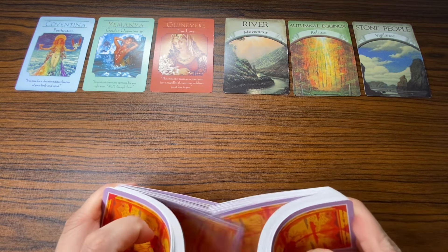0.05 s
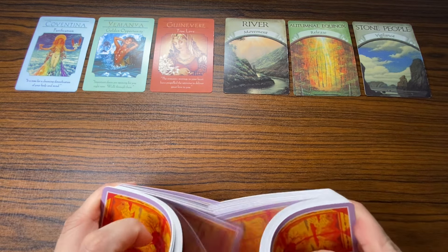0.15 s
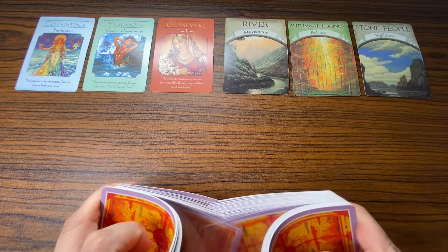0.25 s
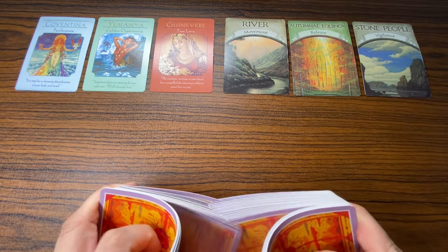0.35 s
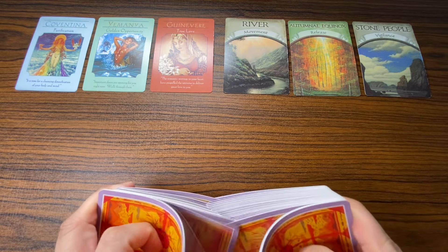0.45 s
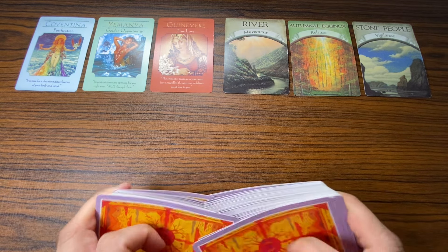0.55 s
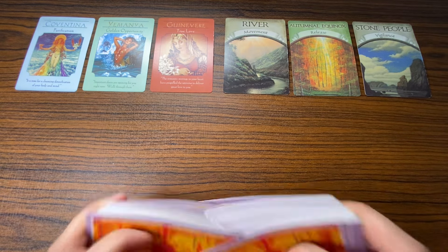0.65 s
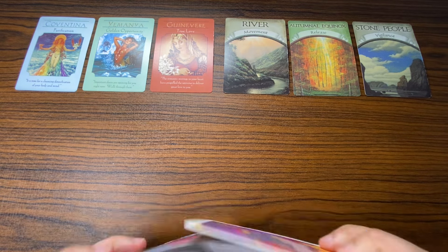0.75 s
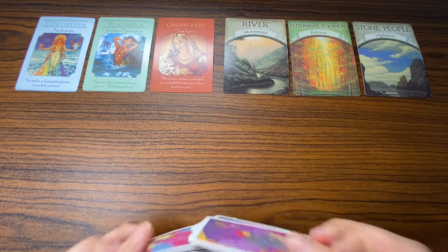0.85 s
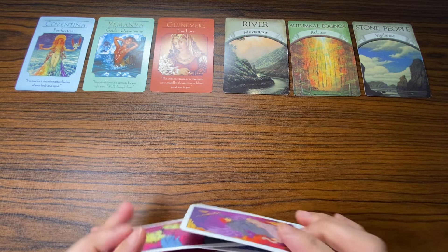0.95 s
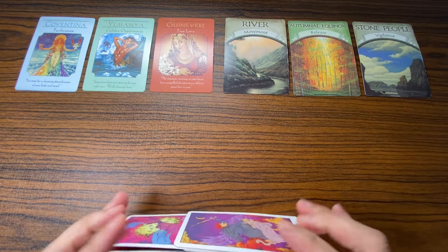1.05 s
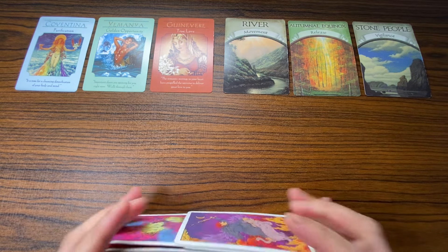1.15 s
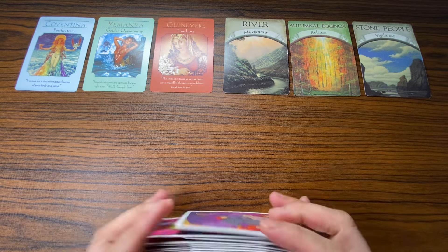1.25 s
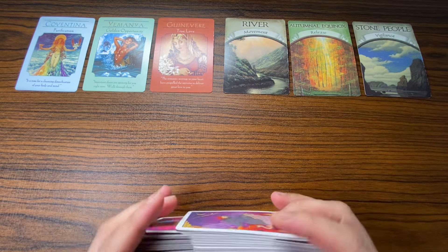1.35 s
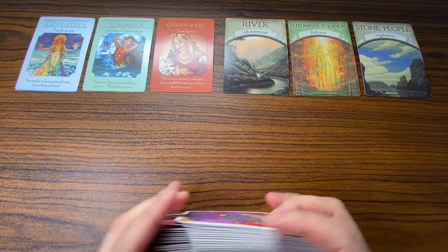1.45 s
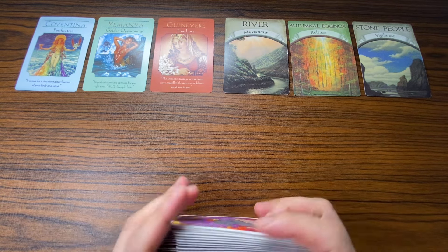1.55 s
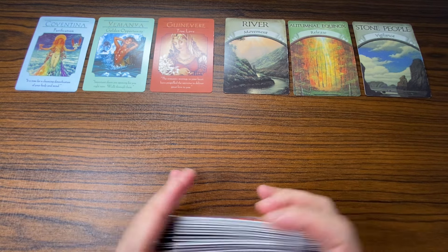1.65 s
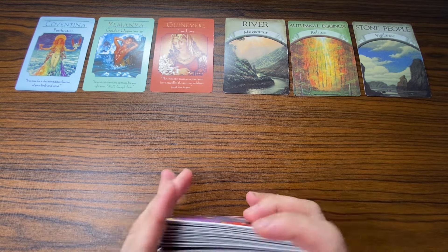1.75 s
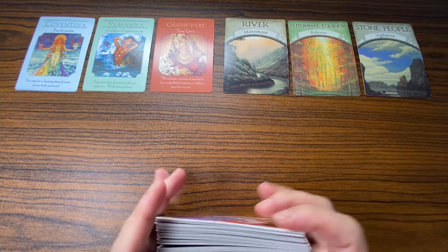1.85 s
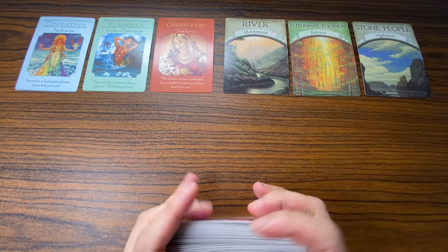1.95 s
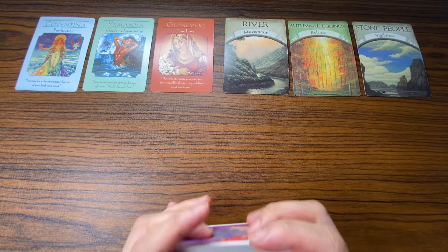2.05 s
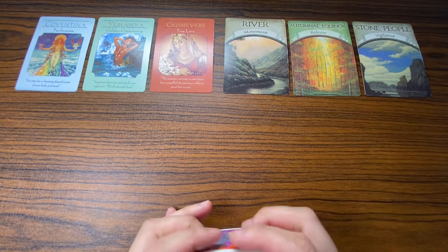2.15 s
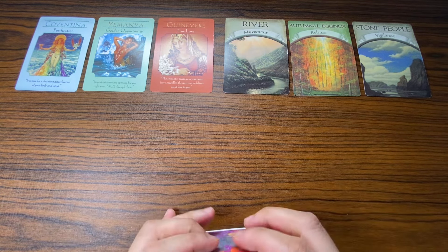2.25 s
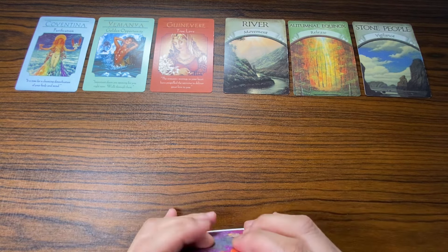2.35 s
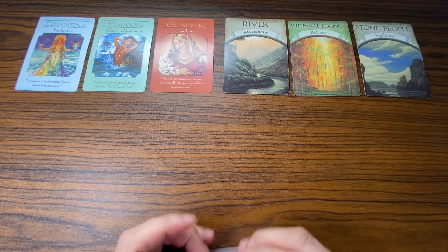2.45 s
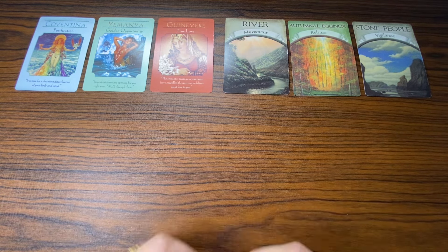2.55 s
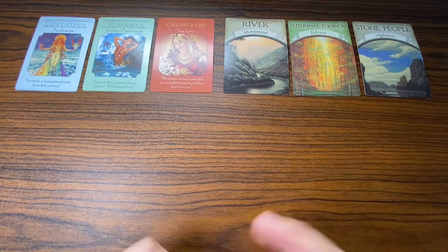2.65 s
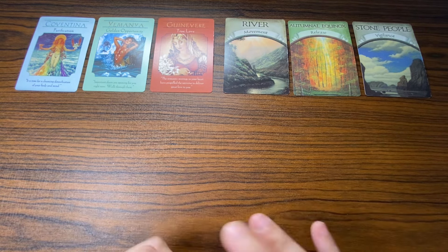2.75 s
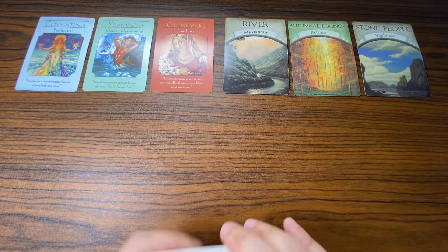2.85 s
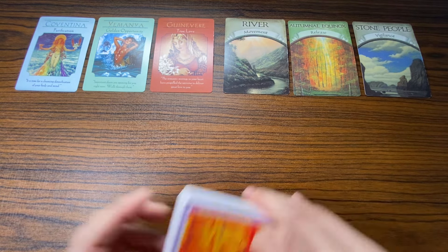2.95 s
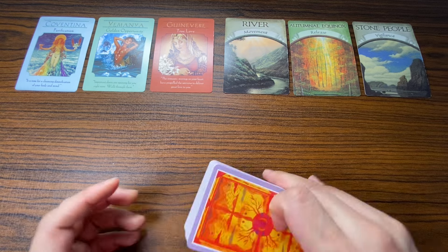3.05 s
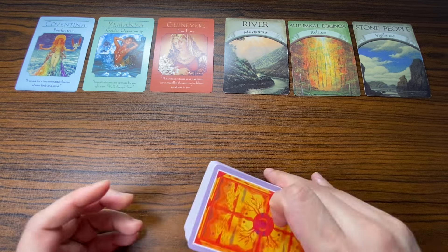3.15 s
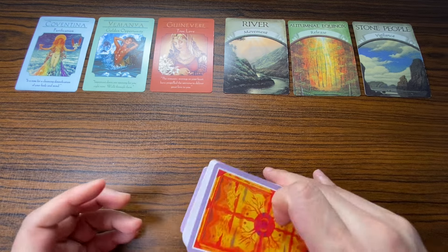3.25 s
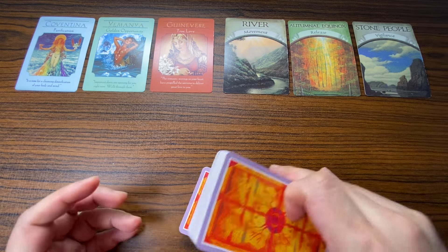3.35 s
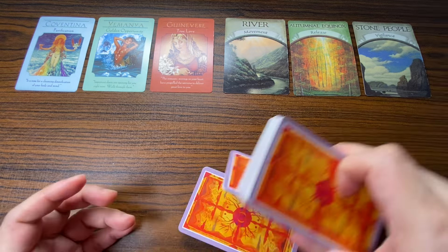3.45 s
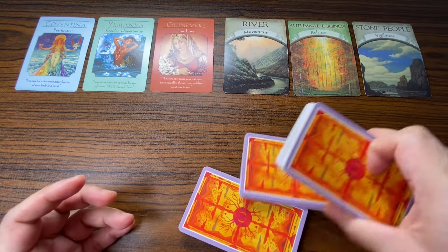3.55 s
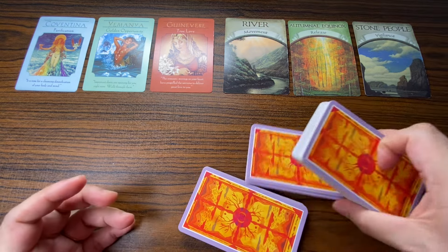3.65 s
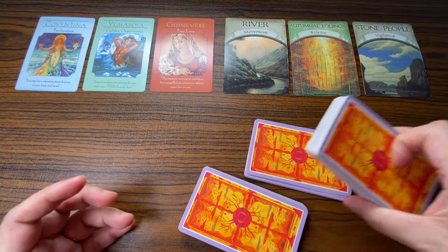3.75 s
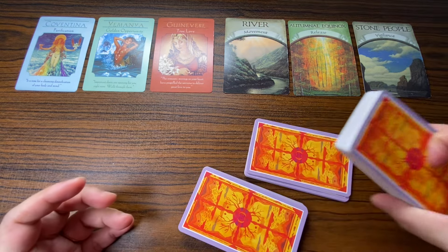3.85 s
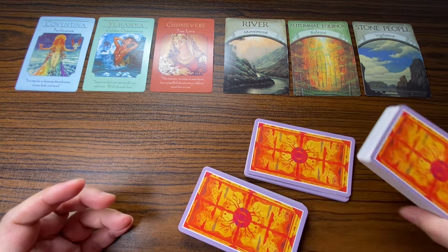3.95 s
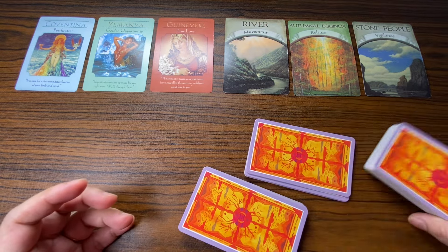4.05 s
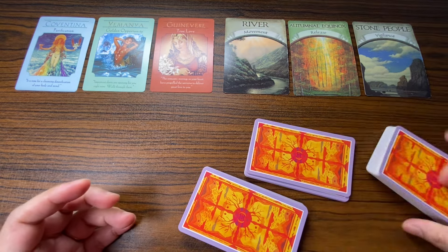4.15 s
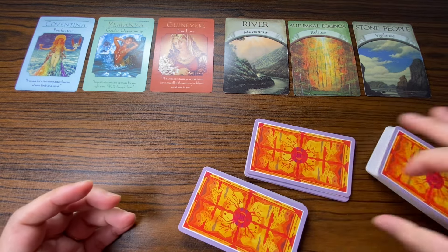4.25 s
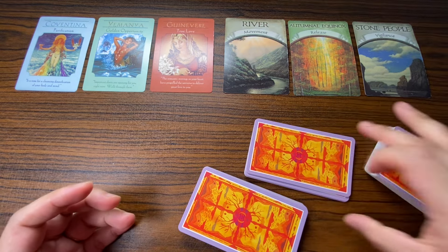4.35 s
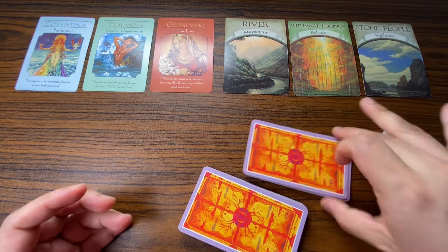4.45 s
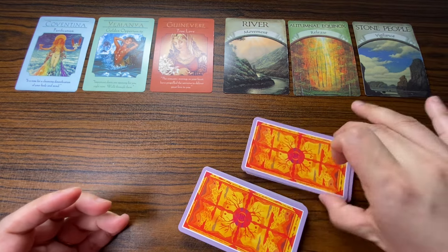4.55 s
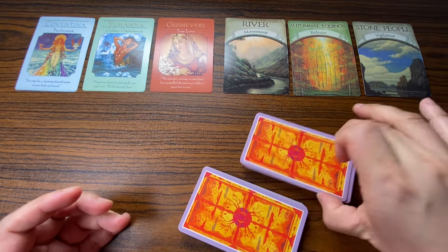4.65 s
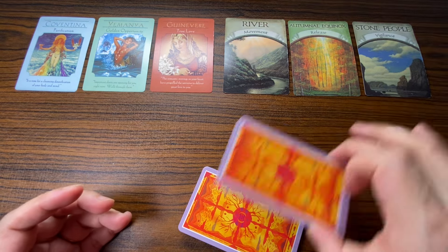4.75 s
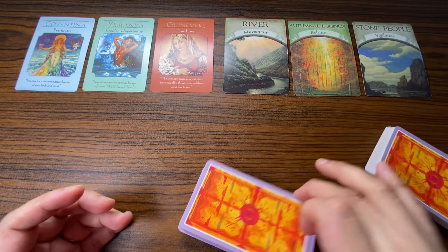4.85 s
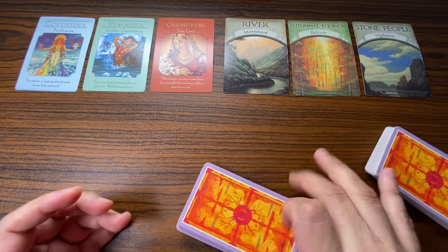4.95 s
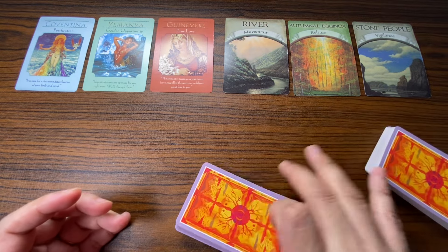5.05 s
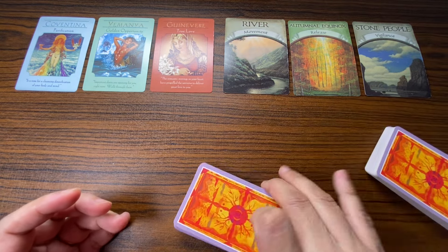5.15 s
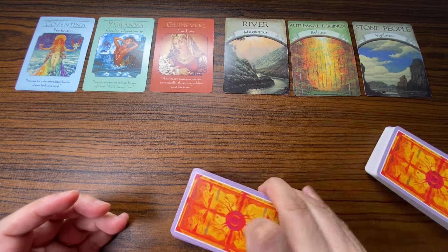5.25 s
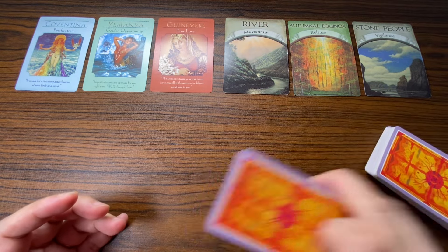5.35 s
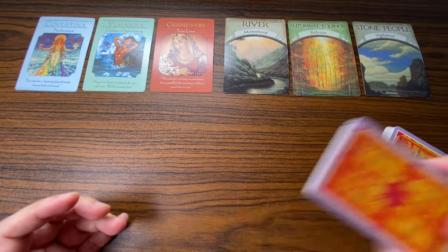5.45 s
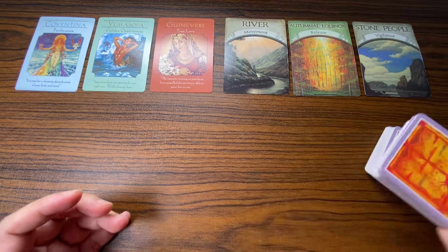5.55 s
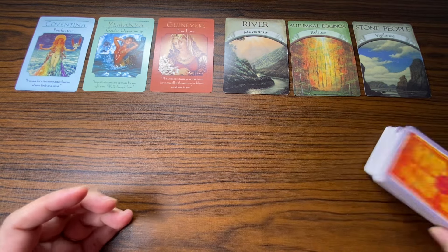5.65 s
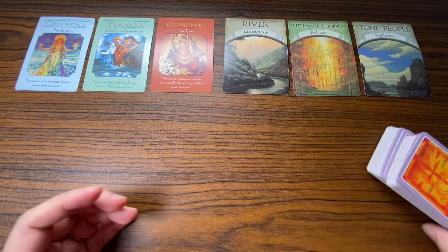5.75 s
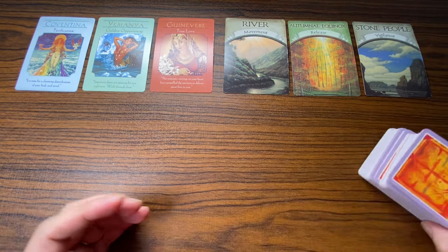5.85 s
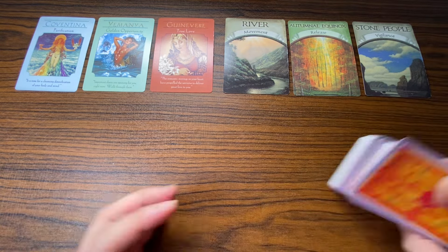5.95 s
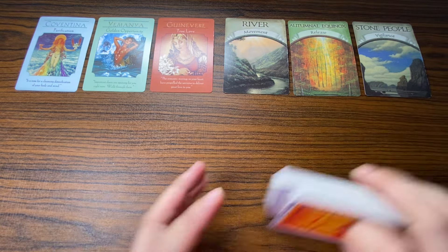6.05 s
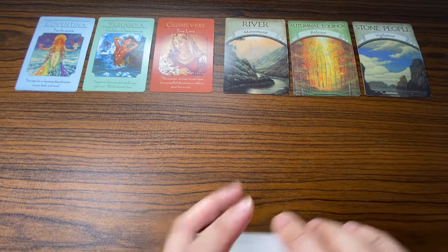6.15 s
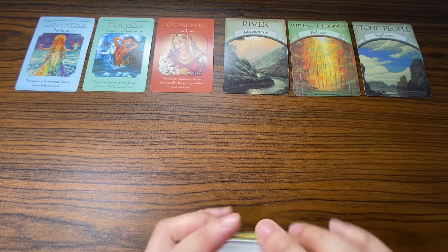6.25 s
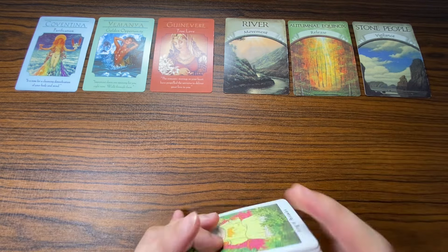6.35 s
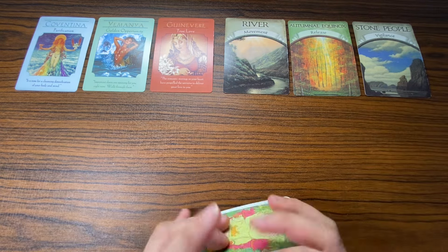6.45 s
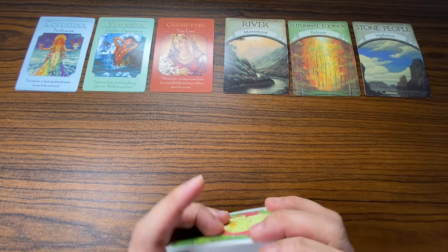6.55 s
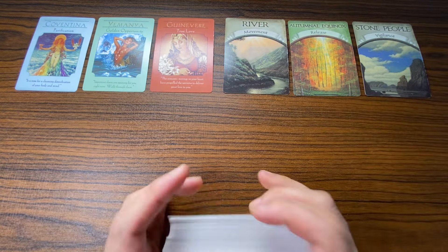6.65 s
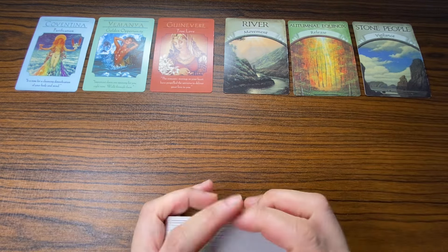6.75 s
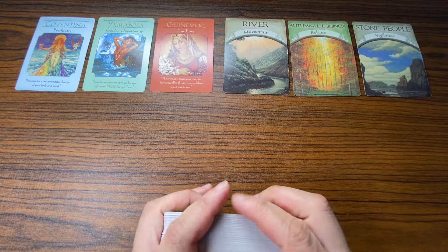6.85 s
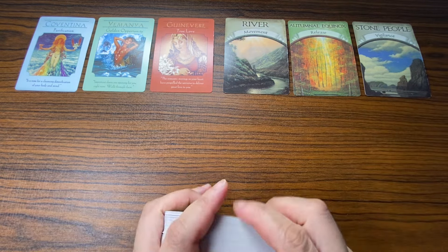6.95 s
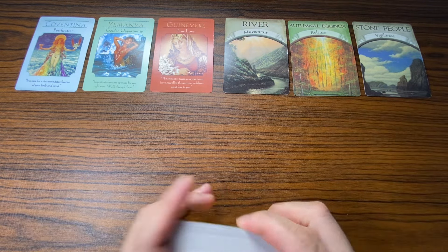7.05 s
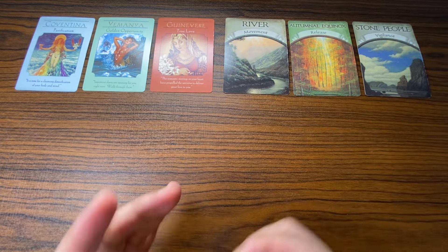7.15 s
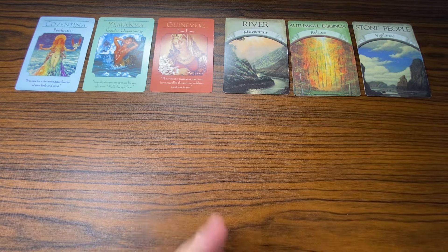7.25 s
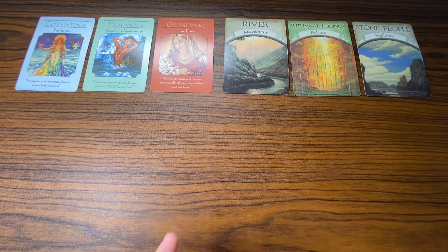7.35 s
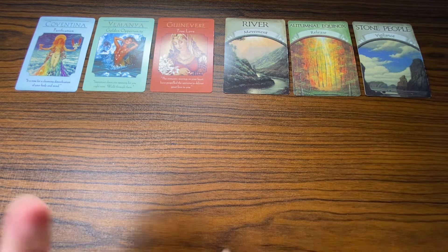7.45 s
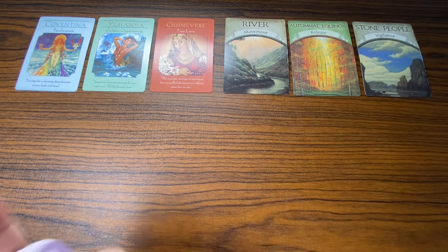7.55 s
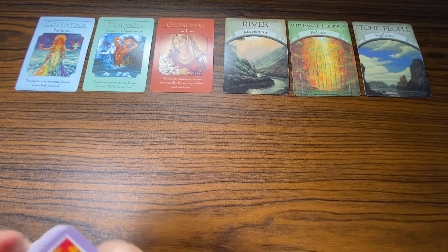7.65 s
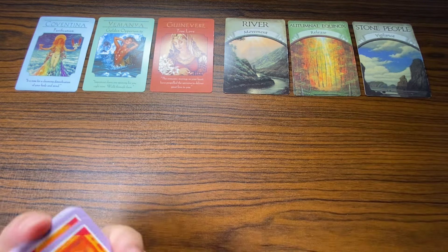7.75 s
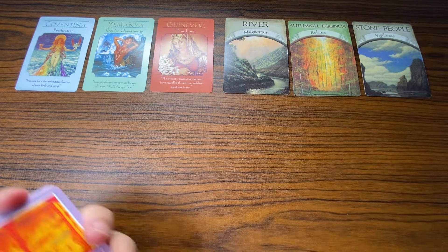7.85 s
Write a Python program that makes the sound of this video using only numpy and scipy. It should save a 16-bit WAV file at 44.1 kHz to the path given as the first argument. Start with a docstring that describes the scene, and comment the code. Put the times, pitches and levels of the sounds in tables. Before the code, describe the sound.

A deck of large cards riffles in a fast fluttering burst, is knocked square, cut into piles and restacked on a wooden table.

```python
"""Riffling and stacking a deck of cards

A deck of large cards is riffled on a wooden table, pushed together, squared, cut into piles and stacked again.
Card snaps, ticks, clacks and slaps are short bursts of coloured noise; rasping edges, sliding cards and
brushing fingers are noise driven by many tiny slips. Decaying sine waves ring the table top.
A small room answers, a low hum wavers behind it all, and the stereo microphone is close."""
import sys
import numpy as np
from scipy import signal
from scipy.fft import rfft, irfft, next_fast_len
from scipy.io import wavfile
from scipy.ndimage import map_coordinates

SR = 44100
rng = np.random.default_rng(int(sys.argv[2]) if len(sys.argv) > 2 else 0)


def store_wav(level_fs):
    """Save 16-bit WAV to argv[1]."""
    pcm = np.round(np.clip(np.atleast_2d(level_fs), -1, 1) * 32767)
    wavfile.write(sys.argv[1], SR, pcm.T.astype(np.int16))


N = 347949
RING = np.arange(SR // 10) / SR  # time inside one card contact (s)

# Colour of card edges knocking. Each row: frequency in Hz, relative level in dB.
CLACK_COLOUR = [(150, -24), (500, -4.5), (1100, -6.5), (1750, -3.5), (2300, 0.5), (3400, 7), (5000, 4.5),
                (6700, 4.5), (7700, -6.5), (10500, -6), (13000, -22), (16500, -37)]
# Colour of a card edge or corner flicking free. Each row: frequency in Hz, relative level in dB.
TICK_COLOUR = [(300, -33), (1000, 6), (4000, 2.5), (8000, 5), (12500, 5), (16500, -13.5)]
# The deck is pushed together and squared. Each row: rasp start in seconds, moment the cards hit home in
# seconds, rattle length in seconds, relative rasp level in dB, relative table thud in dB, hardness in dB.
SQUARINGS = [(0.828, 0.832, 0.021, -25, -18, -1), (0.985, 1.031, 0.077, -27.5, -26.5, -1.5),
             (1.664, 1.703, 0.0065, -22.5, -25, -5), (1.774, 1.798, 0.044, -26, -31, 8.5),
             (2.125, 2.1598, 0.017, -21.5, -17.5, -9), (6.263, 6.269, .009, -23.5, -12, -4.5),
             (6.607, 6.634, 0.017, -24.5, -31.5, 6), (6.987, 7.0356, 0.017, -53, -22, -7)]
# Piles set down flat. Each row: time in seconds, card slap in dB, packet tock in dB, relative table thud
# in dB, table body in dB against the thud, table knock in dB against the thud.
LANDINGS = [(2.7521, -31.5, -30, -50, -11, -1), (3.2283, -12, -14, -10, 0.5, 5),
            (3.53, -45, -48, -20, -5, -11), (4.089, -31.5, -45, -17.5, -2, -27),
            (4.1273, -21, -13.5, -12.5, 3, -3.5), (4.903, -36, -50, -24.5, -1, -12.5),
            (5.6367, -41, -22, -7.5, -10, -13.5)]


def amp(db):
    """Turn decibels into a gain."""
    return 10 ** (np.asarray(db) / 20)


def unit(x):
    """Scale a sound to an rms level of 1."""
    return x / np.sqrt(np.mean(x ** 2) + 1e-20)


def along(points, hz):
    """Read a curve of (Hz, value) points, with frequency on a log axis."""
    f, v = np.transpose(points)
    return np.interp(np.log(hz + 1), np.log(f + 1), v)


def gains(rows, fade=0.0096):
    """Turn rows of (seconds, dB, ..) into a gain curve per dB column, fading in and out over fade seconds."""
    s, *columns = np.transpose(rows)
    t = np.arange(N) / SR
    gate = np.clip(1 + np.minimum(t - s[0], s[-1] - t) / fade, 0, 1)
    return [gate * amp(np.interp(t, s, column)) for column in columns]


def wobble(rate):
    """Draw a smooth random curve through rate random points a second."""
    points = rng.standard_normal(int(N * rate / SR) + 4)
    return map_coordinates(points, [np.arange(N) * rate / SR])


def chance(start, end, rate):
    """Pick loosely spaced times in seconds, rate of them a second."""
    slots = np.arange(start, end - 1 / rate, 1 / rate)
    return slots + rng.random(len(slots)) / rate


def add(track, s, sound):
    """Mix a sound into the track at s seconds."""
    start = max(round(s * SR), 0)
    track[..., start:start + sound.shape[-1]] += sound[..., :N - start]


def coloured(x, curve):
    """Filter a sound so its gain in dB is curve(Hz), with no echo ahead of the sound (minimum phase)."""
    n = x.shape[-1]
    m = 2 * next_fast_len(n // 2 + 2048)
    gain = amp(curve(np.fft.rfftfreq(m, 1 / SR)))
    cepstrum = irfft(np.log(np.maximum(gain, 1e-6)))
    # folding the second half onto the first makes the filter act only after its input
    cepstrum[1:m // 2] *= 2
    cepstrum[m // 2 + 1:] = 0
    return irfft(rfft(x, m) * np.exp(rfft(cepstrum)), m)[..., :n]


def noise(spectrum, drive=1):
    """Make stereo noise of rms 1 under a drive: more alike left and right in the bass than in the treble."""
    # Each row: frequency in Hz, left-right likeness from 0 (unrelated) to 1 (the same).
    likeness = [(60, 0.82), (130, 1), (260, 0.64), (600, 0), (3000, 0), (12000, 0.09)]
    a, b = rng.standard_normal((2, N)) * drive
    alike = lambda hz: np.clip(along(likeness, hz), -.99, .99)
    mid = coloured(a, lambda hz: along(spectrum, hz) + 10 * np.log10(1 + alike(hz)))
    side = coloured(b, lambda hz: along(spectrum, hz) + 10 * np.log10(1 - alike(hz)))
    return unit(np.array([mid + side, mid - side]))


def grains(rate, spread_db, life):
    """Make a drive of rms 1 from tiny slips at random times, each falling 60 dB within life seconds."""
    strength = amp(spread_db * np.clip(rng.standard_normal(N), -2, 2))
    slips = (rng.random(N) < rate / SR) * strength
    return unit(signal.lfilter([1], [1, -amp(-60 / (life * SR))], slips))


def contact(spectrum, tone, t60, hold=0, shared=0.44, grip_db=3.5):
    """One blow: a short crackle, held while its cards arrive, with its colour shaped by the blow's tone."""
    common, *own = rng.standard_normal((3, len(RING)))
    decay = amp(-60 * np.maximum(RING - hold, 0) / t60)
    burst = (shared * common + np.array(own)) * decay * (1 - np.exp(-RING / 0.00064))
    # each card is bent and gripped differently, which shifts its resonances
    grip = np.column_stack([np.geomspace(700, 14000, 22), grip_db * rng.uniform(-1, 1, 22)])
    return coloured(burst, lambda hz: along(spectrum, hz) + along(tone, hz) + along(grip, hz))


def background(floor_db=-43, hum_db=0, drift=1.0):
    """Ventilation: a dull rush of noise, and low sine tones that waver in pitch and level."""
    # The rush. Each row: frequency in Hz, relative level in dB.
    rush_colour = [(20, -32), (40, -12.5), (65, -7), (110, -5), (135, -9), (172, -4.5), (215, -5),
                   (290, -12.5), (400, -18.5), (1100, -24), (1650, -30), (2200, -33.5), (3500, -39.5),
                   (4400, -36.5), (7500, -54.5), (13000, -55), (15000, -75)]
    # The hum. Each row: frequency in Hz, level in dB.
    hum_tones = [(167, -40.5), (280, -53.5)]
    t = np.arange(N) / SR
    hum = np.zeros((2, N))
    for hz, db in hum_tones:
        phase = 2 * np.pi * hz * t + drift * wobble(26)
        waver = amp(3 * wobble(7))
        hum += amp(db + hum_db) * waver * np.sin(phase + [[.3], [-.3]])
    return hum + amp(floor_db) * noise(rush_colour)


def room(x, gap=0.0016):
    """The walls answer after a short gap with a tail of noise, each pitch dying at its own speed."""
    # Each row: frequency in Hz, time to fall 60 dB in seconds.
    decay_times = [(100, 0.8), (300, 0.24), (900, 0.21), (2500, 0.34), (6000, 0.27), (13000, 0.2),
                   (16000, 0.11)]
    # Each row: frequency in Hz, reflected level in dB.
    reflected = [(60, -13), (200, -2.5), (600, -1.5), (3000, -4), (6500, -5.5), (9000, -3.5), (15000, -16)]
    out, size = np.zeros((2, N)), SR // 2
    # every half second of sound gets a fresh random tail
    for start in range(0, N, size):
        hz, t, z = signal.stft(rng.standard_normal((2, size)), SR, nperseg=256)
        decay = amp(-60 * t / along(decay_times, hz)[:, None])
        tail = signal.istft(z * decay, SR)[1]
        tail *= np.clip(np.arange(tail.shape[1]) / SR / gap - 1, 0, 1)
        tail = tail / np.linalg.norm(tail[0])
        add(out, start / SR, signal.fftconvolve(x[:, start:start + size], tail, axes=1))
    return coloured(out, lambda hz: along(reflected, hz))


def blows(body_db=-0.5, body_share=0.83):
    """List all that strikes the table as (s, thud dB, body dB, knock dB); harder squaring adds body and knock."""
    # The hands bump the table softly. Each row: time in seconds, relative thud in dB.
    bumps = [(0.485, -25), (3.6, -21), (4.407, -32.5), (5.099, -28), (6.814, -26)]
    bump_body_db, bump_knock_db = -9.5, -21.5  # against the thud
    flats = [(s, db, body, knock) for s, *_, db, body, knock in LANDINGS]
    edges = [(home, db, body_db + body_share * hard, hard) for _, home, *_, db, hard in SQUARINGS]
    return flats + edges + [(s, db, bump_body_db, bump_knock_db) for s, db in bumps]


def table(blow_db=-7, attack=0.0011, apart_hz=420, dense_db=3, dense_t60=0.053):
    """Each blow rings the wooden top's modes: soft ones press in slowly, harder ones reach higher modes."""
    # Modes of the top. Each row: nominal frequency in Hz, relative level in dB, time to fall 60 dB in seconds.
    modes = [(70.9, 2.5, 0.3), (92.6, -0.5, 0.089), (116.3, 0.5, 0.21), (169.1, -1.5, 0.31),
             (220.7, 3, 0.049), (270.5, -2, 0.14), (323.3, -4, 0.07), (383, -2.5, 0.064),
             (443.6, 1.5, 0.075), (496, -4.5, 0.094), (730, -2.5, 0.072), (1125, -4.5, 0.089)]
    # Colour of the short knock. Each row: frequency in Hz, relative level in dB.
    knock_colour = [(120, -18.5), (300, -11), (600, -2), (820, 9), (1200, -4), (1800, -10), (3000, -18),
                    (8000, -37.5)]
    out, t = np.zeros((2, N)), np.arange(SR // 2) / SR
    hz, level, t60 = np.transpose(modes)
    decay = amp(-60 * t / t60[:, None])
    for s, db, body_db, knock_db in blows():
        strength, detune, turn = rng.uniform(-1.25, 1, (3, len(hz)))
        tone = along([(80, 0.0015), (210, body_db), (500, body_db), (750, knock_db)], hz)
        size = amp(db + blow_db + level + tone + 2 * strength)
        # higher modes differ more between left and right
        apart = turn * np.minimum(hz / apart_hz, 1) * np.pi / 2
        phase = np.multiply.outer([1, -1], apart) + np.pi * np.arange(len(hz))
        swing = np.sin(2 * np.pi * np.outer(hz * (1 + .012 * detune), t) + phase[..., None])
        press = 1 - np.exp(-t * amp(body_db) / attack)
        add(out, s, size @ (swing * decay) * press)
        # the crowded upper modes merge into a short knock
        add(out, s, amp(db + knock_db + dense_db) * contact(knock_colour, [(1, 0)], dense_t60))
    # a panel radiates little below its lowest mode
    return coloured(out, lambda f: along([(20, -16.0), (40, -16.5), (62, 2.5)], f))


def deck(x, width_hz=85, trim_db=-2.0):
    """The stack of cards lifts a few narrow bands of every sound made on it."""
    # Resonances of the held deck. Each row: frequency in Hz, lift in dB before the overall trim.
    resonances = [(1090, 2), (1700, 7), (2260, 6.5), (2950, 2.5), (3470, 4.5), (4700, 1.5), (6250, 2)]
    bump = lambda f, hz: np.exp(-((f - hz) / width_hz) ** 2)
    return coloured(x, lambda f: trim_db + sum(db * bump(f, hz) for hz, db in resonances))


def rubbing(spectrum, drive, count=3):
    """Friction of rms 1: patches of card catch and let go in turn, each with its own resonances."""
    out = np.zeros((2, N))
    for _ in range(count):
        grip = np.column_stack([np.geomspace(400, 9000, 30), rng.uniform(-7, 7, 30)])
        patch = coloured(noise(spectrum, drive), lambda hz: along(grip, hz))
        out += amp(4 * wobble(55)) * patch
    return unit(out)


def handling(slide_db=-1, skin_db=-1):
    """Strokes swell and fade as cards slide on cards and wood and skin brushes them; a held deck rustles."""
    # Each row: start in seconds, end in seconds, relative sliding level in dB, relative skin brushing in dB.
    strokes = [(0.64, 0.724, -46.5, -45.5), (1.135, 1.294, -37.5, -49), (1.394, 1.52, -38, -42.5),
               (1.86, 2.062, -45.5, -55.5), (2.094, 2.158, -33.5, -53), (2.377, 2.455, -48, -56),
               (3.212, 3.239, -25, -70), (3.391, 3.557, -39, -54), (3.533, 3.726, -46, -78),
               (4.055, 4.15, -38.5, -46.5), (4.38, 4.492, -38.5, -57), (5.066, 5.132, -48, -57.5),
               (5.613, 5.656, -41.5, -53.5), (5.951, 6.13, -37.5, -50.5), (6.07, 6.226, -35.5, -56),
               (6.247, 6.317, -29, -62), (6.382, 6.59, -45, -61), (6.562, 6.675, -35, -64),
               (6.77, 6.96, -46.5, -54.5), (6.912, 7.122, -41, -56), (7.27, 7.407, -78, -56),
               (7.696, 8.03, -64, -52)]
    # The fingers hold and shift the deck. Each row: start in seconds, end in seconds.
    holds = [(0.55, 3.18), (3.4, 3.73), (5.65, 7.58)]
    # Colours of sliding cards and brushing skin. Each row: frequency in Hz, relative level in dB.
    slide_colour = [(150, -22), (300, 5), (470, 9), (620, 2.5), (1000, 1.5), (2000, -8.5), (6500, -15),
                    (9000, -45.5), (16000, -65)]
    skin_colour = [(2000, -7.5), (5000, -6), (8000, -5.5), (10000, -1.5), (13300, -10), (14500, -14.5),
                   (16500, -29.5)]
    hold_slide_db, hold_skin_db, fidget_db = -61, -66.5, 5  # rustle levels, and how much they waver
    slide, skin = np.zeros((2, N))
    for start, end, sliding_db, brushing_db in strokes:
        speed = signal.windows.tukey(max(round((end - start) * SR), 2), .7)
        add(slide, start, amp(sliding_db + slide_db) * speed)
        add(skin, start, amp(brushing_db + skin_db) * speed)
    held = sum(gains([(start, 0), (end, 0)], fade=0.024)[0] for start, end in holds)
    held = held * amp(fidget_db * wobble(27))
    slide = np.hypot(slide, amp(hold_slide_db) * held)
    skin = np.hypot(skin, amp(hold_skin_db) * held)
    catches = grains(rate=700, spread_db=3.5, life=.02)
    ridges = grains(rate=3000, spread_db=2, life=.02)
    return slide * rubbing(slide_colour, catches) + skin * noise(skin_colour, ridges)


def shoves(rasp_db=-3, chatter_db=10, fade=0.011):
    """Card edges catch and slip past each other: a rasp swells until they hit home; hard pushes add crisp ticks."""
    # Colour of the rasp. Each row: frequency in Hz, relative level in dB.
    rasp_colour = [(120, -34.5), (220, 3), (600, -1), (850, 4.5), (1300, -3), (1700, 2), (3000, 1.5),
                   (4500, -9.5), (6700, -30), (7800, -31), (12000, -28.5), (16000, -43.5)]
    swell_db_per_s = 193  # the rasp grows as the cards near home
    push = np.zeros(N)
    for touch, home, rattle, db, *_ in SQUARINGS:
        start = min(touch, home)
        start_db = db - swell_db_per_s * (home - start)
        push += gains([(start, start_db), (home, db), (home + rattle, db)], fade)[0]
    slips = grains(rate=800, spread_db=3.5, life=.006)
    catches = grains(rate=400, spread_db=3, life=.003)
    rasp = amp(rasp_db) * push * noise(rasp_colour, slips)
    # squaring the push brings the little ticks out on hard pushes
    return rasp + amp(chatter_db) * push ** 2 * noise(CLACK_COLOUR, catches)


def ticks(tick_db=-8, tick_t60=0.0083, hold=0.0015):
    """Card corners flick past the fingertips, each a short burst with more or less snap below its treble."""
    # Each row: time in seconds, relative tick level in dB, snap in dB against the tick.
    flicks = [(3.191, -40, 2), (3.487, -32.5, 12), (3.527, -33, -15), (3.547, -40, 12), (3.637, -40.5, 7),
              (3.9354, -25, -3), (4.829, -37, -5), (4.9008, -19.5, -3), (4.9095, -35, 4),
              (6.535, -28.5, -2), (7.62, -36.5, -5)]
    out = np.zeros((2, N))
    for s, db, snap_db in flicks:
        tone = [(5500, snap_db), (8500, 0.0038)]
        add(out, s, amp(db + tick_db) * contact(TICK_COLOUR, tone, tick_t60, hold))
    return out


def clacks(clack_db=-3, clack_t60=0.018, hold=0.0019):
    """Packets of card edges knock together in short bursts, duller when softer."""
    # Each row: time in seconds, relative clack level in dB, hollowness (lift of the lower tones) in dB.
    knocks = [(.8222, -29.5, 25), (0.828, -33, 27.5), (.844, -38, 24), (.988, -20, 14.5), (1.0285, -4.5, 2),
              (1.044, -10, 1), (1.062, -12, -6), (1.081, -18, 12), (1.165, -28, 15.5), (1.664, -35.5, 23),
              (1.681, -18, -1), (1.697, -23.5, 20), (1.709, -29, 18), (1.785, -39, 26), (1.836, -27.5, 19),
              (2.128, -23, 14), (2.148, -13, 8.5), (2.16, -12, 11), (6.133, -39.5, 27),
              (6.177, -44.5, 33.5), (6.2675, -7, 6.5), (6.272, -4.5, 7.5), (6.6142, -23, 7),
              (6.636, -24.5, 13), (6.648, -35, 18), (6.9801, -39, 27), (7.034, -37, 18)]
    edge_tick_db, fewer_ticks = 2.5, 0.59  # top treble of a full clack; dB less for each dB softer
    out = np.zeros((2, N))
    for s, db, hollow in knocks:
        tone = [(1500, hollow), (3200, 0), (7000, 0), (9000, edge_tick_db + fewer_ticks * db)]
        add(out, s, amp(db + clack_db) * contact(CLACK_COLOUR, tone, clack_t60, hold))
    return out


def piles(slap_t60=0.018, tock_hz=830, tock_hz_per_db=8, tock_rise=0.0014):
    """A pile lands with a broad flat slap, fuller when harder; the stiff packet tocks briefly, higher when light."""
    # Colour of the slap. Each row: frequency in Hz, relative level in dB.
    slap_colour = [(150, -4), (500, -9.5), (3200, 5), (7000, 3), (11500, -4), (16500, -25)]
    flat_slap_db, fuller = 24, 0.66  # hollowness of a full flat landing; dB less for each dB softer
    out, swell = np.zeros((2, N)), RING / tock_rise
    for s, db, tock_db, *_ in LANDINGS:
        slap = contact(slap_colour, [(1900, flat_slap_db + fuller * db), (3600, 0)], slap_t60)
        pitch = tock_hz - tock_hz_per_db * tock_db
        tock = np.sin(2 * np.pi * pitch * RING) * (swell * np.exp(1 - swell)) ** 2
        add(out, s, amp(db) * slap + amp(tock_db) * tock)
    return out


def riffle(snap_db=0, snap_t60=0.0082, clump_s=0.0036, edge_db=-3, edge_t60=0.0043, flutter_db=-6, air_db=-4.5):
    """Bent cards spring free: the edge ticks, the card snaps, and lighter ones flutter between, fanning air."""
    # Loud releases. Each row: time in seconds, relative strength in dB, thickness from 0 (one card)
    # to 1 (a clump), relative slap in dB.
    loud = [(0.0004, -3.5, 0.86, -12.5), (.0315, -14.5, 0.5, -9.5), (.061, -16, .2, -10.5),
            (0.1228, -11.5, 0.31, -10.5), (0.183, -16, .3, -7), (.197, -16, 0.49, 5.5),
            (.226, -16.5, .4, -6), (0.077, -8, 0.45, -10.5), (0.0935, -3, 0.69, -17),
            (0.1371, -4, 0.76, -13), (0.1658, -5, 0.092, -11.5), (0.2136, -7.5, 0.35, -9),
            (0.2829, -2, 0.72, -10), (0.3123, -7, .02, -16.5), (0.34, -13.5, .15, -7.5),
            (.355, -13.5, .05, -3.5), (0.387, -12.5, 0.33, 1), (.397, -12.5, 0.44, 2.5),
            (.417, -11.5, 0.51, -2), (.444, -12, .15, -9.5), (0.452, -15, .3, 2), (0.463, -16, 0.46, -4.5),
            (0.3756, -9, 0.47, 5), (0.4382, -7, 0.53, -13), (0.483, -0.5, 0.55, -9),
            (0.4924, 1, 0.37, -4.5), (0.487, -11.5, 0.45, -2), (0.5, -7.5, 0.6, -3.5),
            (0.5087, -9.5, 0.41, -3), (.524, -14.5, 0.23, -8.5)]
    # Colours of the snap, the flutter and the fanned air. Each row: frequency in Hz, relative level in dB.
    snap_colour = [(150, -32.5), (500, -11), (1100, -3), (2200, -4), (3500, 6), (4300, 1.5), (5500, 6.5),
                   (6900, 7.5), (7700, -8), (10000, -16.5), (12000, -15), (16500, -25.5)]
    flutter_colour = [(150, -23), (350, -4), (1100, -1), (2400, -8.5), (3500, -7), (6800, -8.5),
                      (8500, -6.5), (12500, -5.5), (15000, -13.5), (16500, -36)]
    air_colour = [(25, -27.5), (50, 2), (75, 4), (120, 2.5), (170, -8), (280, -7), (500, -27.5),
                  (1000, -33.5)]
    flutter_end = 0.489  # flutter, fanned air and light cards last until about here (s); a few loud snaps follow
    # the flutter grows as the cards run faster; less air is fanned as the halves thin out
    levels = [(s, -27.5 + 11.5 * s, -28.5 - 5.5 * s) for s in (0, flutter_end)]
    light_per_s, light_db, light_thick = 16, -22.5, 0.4  # light cards between the loud snaps
    thin_snap_db, thick_tick_db = -11.5, -16  # one card hardly snaps, a thick clump hardly ticks

    out = np.zeros((2, N))
    flutter, air = gains(levels, fade=0.039)
    flicks = grains(rate=300, spread_db=4.5, life=.006)
    out += amp(flutter_db) * flutter * noise(flutter_colour, flicks)
    puffs = grains(rate=200, spread_db=2, life=.03)
    out += amp(air_db) * air * noise(air_colour, puffs)

    light = []
    for s in chance(0, flutter_end, light_per_s):
        # light cards slap harder on the growing pile, and land more or less flat
        slap_db = -8.5 + 13 * s + 5.5 * rng.uniform(-1, 1)
        light.append((s, light_db, light_thick, slap_db))
    for s, db, thick, slap_db in loud + light:
        tick = contact(TICK_COLOUR, [(4000, -14), (8500, 10.0)], edge_t60, shared=1.0)
        slap_tone = [(1300, slap_db + 15.0), (3000, 0)]
        snap = contact(snap_colour, slap_tone, snap_t60, hold=clump_s * thick, grip_db=5.5)
        tick_gain = amp(db + edge_db + thick_tick_db * thick)
        snap_gain = amp(db + snap_db + thin_snap_db * (1.5 - thick))
        add(out, s, tick_gain * tick + snap_gain * snap)
    return out


def scene(wet_db=-0.5):
    """Mix the cards and table close by, their room sound, and the hum behind them."""
    # Each row: frequency in Hz, left minus right level in dB.
    lean = [(60, 2), (250, 4), (500, -2.5), (1000, -1.5), (2000, 1), (5000, -6), (9000, 3), (14000, -0.5)]
    cards = riffle() + piles() + deck(clacks() + ticks() + shoves() + handling())
    wood = table()
    # the table's bass is strong only close by and hardly reaches the walls
    radiated = coloured(wood, lambda hz: along([(100, -18), (350, 0)], hz))
    heard = cards + wood + amp(wet_db) * room(cards + radiated)
    left = coloured(heard[0], lambda hz: along(lean, hz) / 2)
    right = coloured(heard[1], lambda hz: -along(lean, hz) / 2)
    return np.array([left, right]) + background()


def record(dry):
    """The recorder rounds off the highest peaks and steeply cuts what lies above its band limit."""
    top_hz = 15700
    rounded = dry / (1 + np.abs(dry / .92) ** 6) ** (1 / 6)
    return signal.sosfilt(signal.butter(14, top_hz, fs=SR, output="sos"), rounded)


dry = scene()
out = record(dry)
store_wav(out)
```